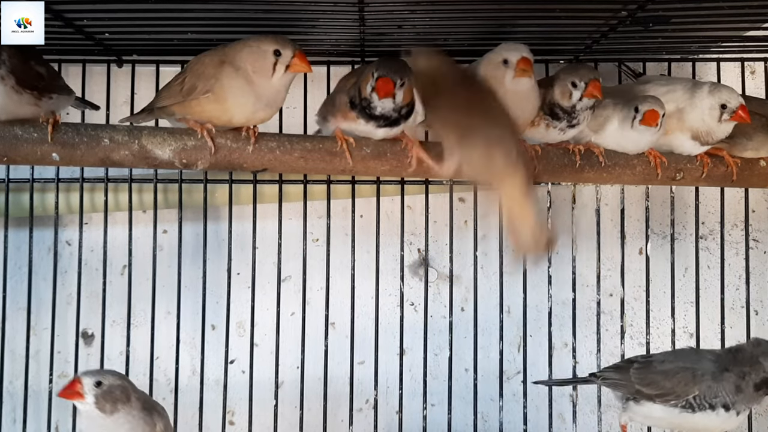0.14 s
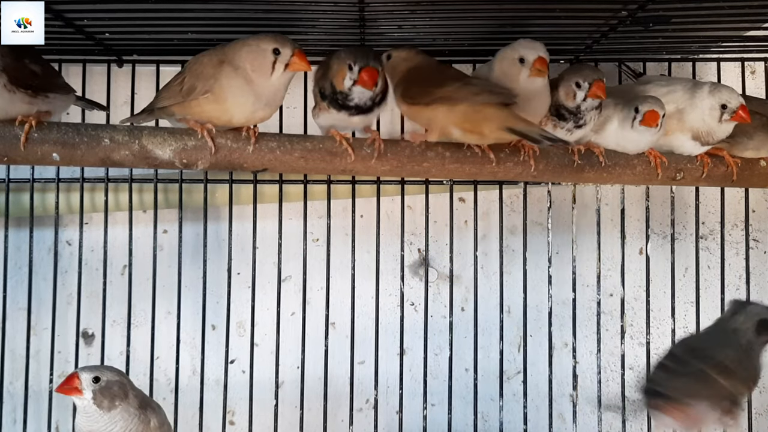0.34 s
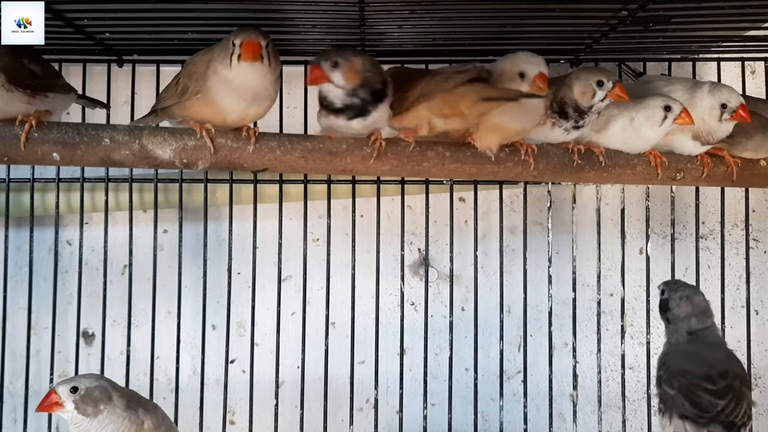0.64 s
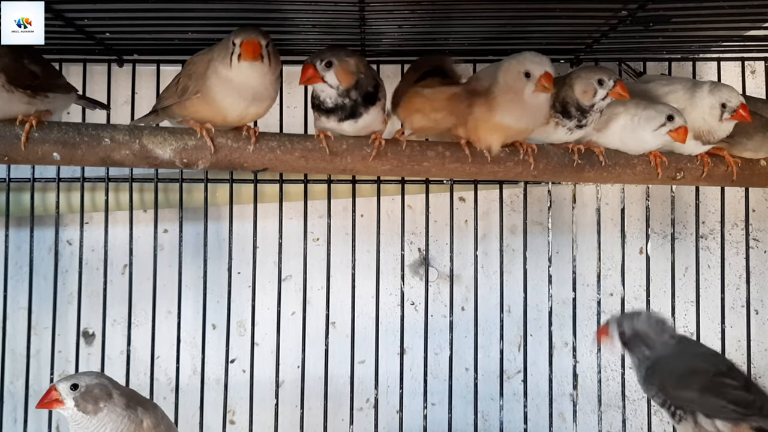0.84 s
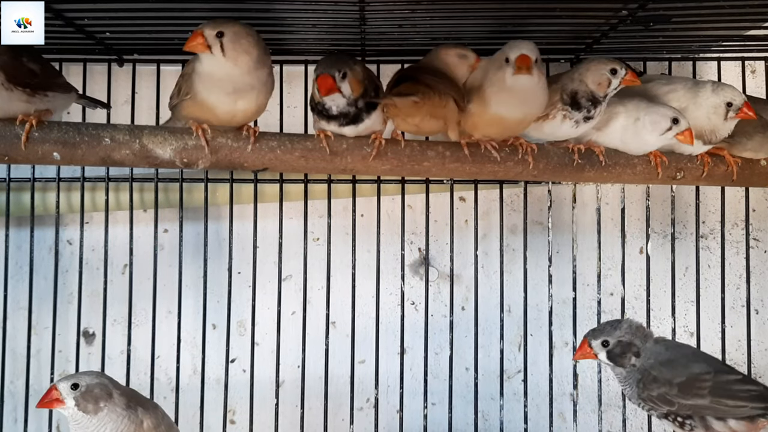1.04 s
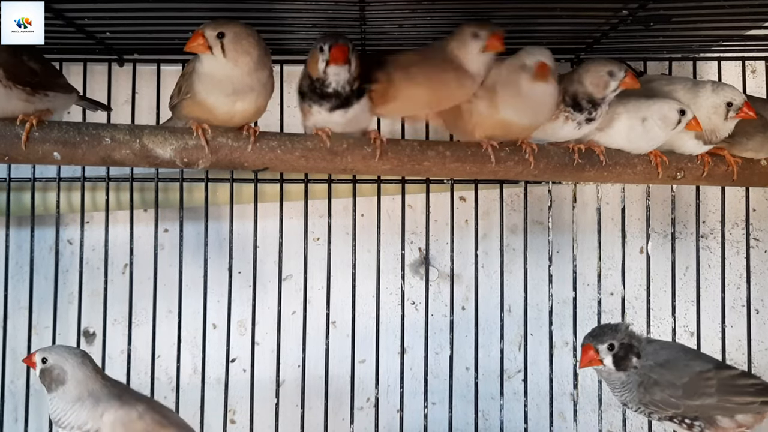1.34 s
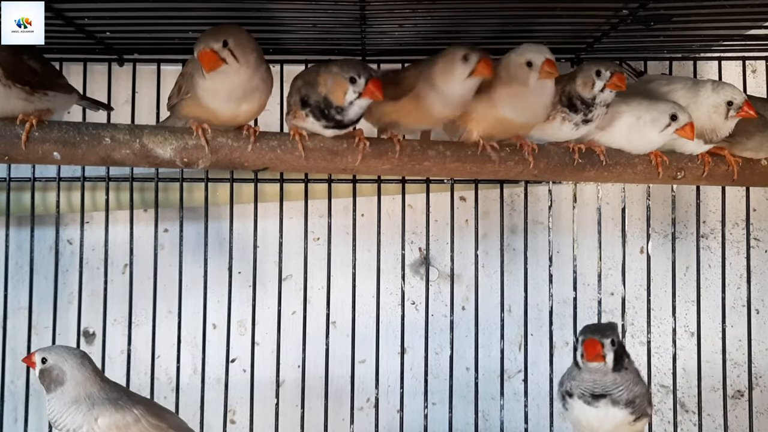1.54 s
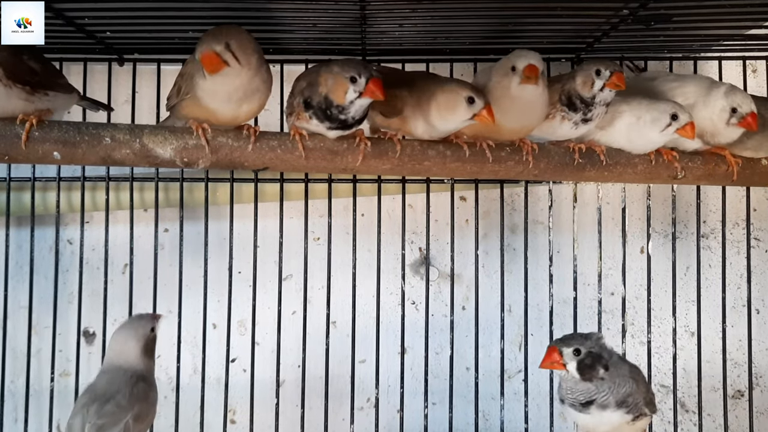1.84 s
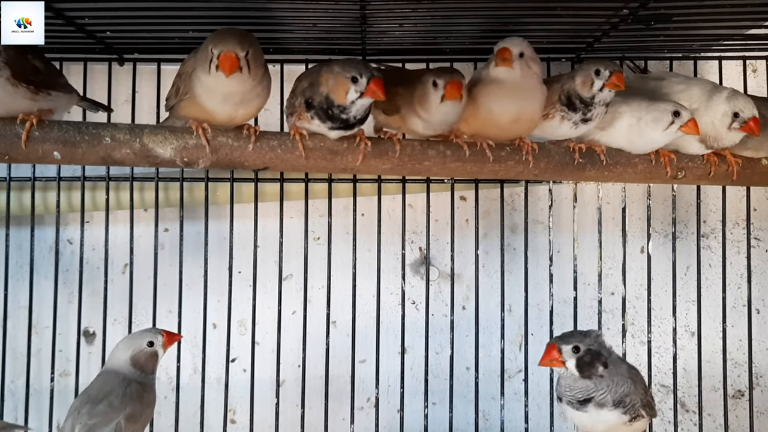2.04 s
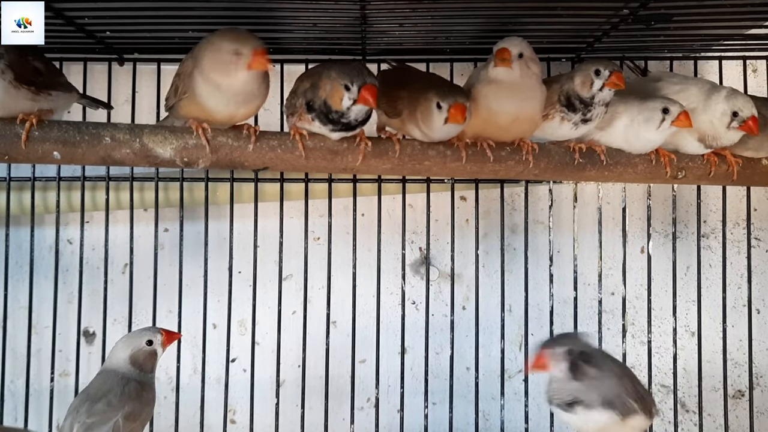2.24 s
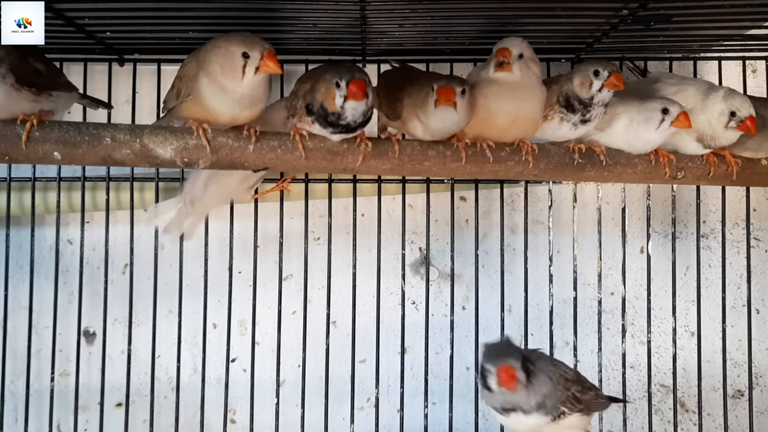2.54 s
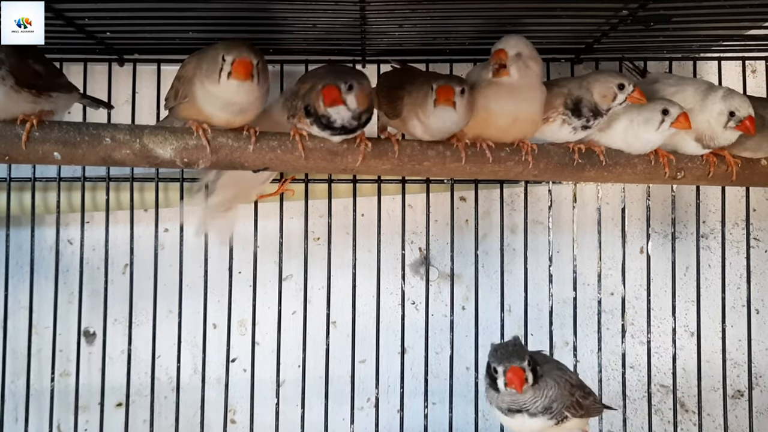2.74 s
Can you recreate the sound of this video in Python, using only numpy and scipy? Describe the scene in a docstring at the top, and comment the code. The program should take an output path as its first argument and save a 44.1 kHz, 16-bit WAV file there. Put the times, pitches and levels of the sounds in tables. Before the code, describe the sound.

Young finches beg in rapid, raspy buzzing calls while adults peep and chatter in an indoor cage

```python
"""A click as the sound cuts in is heard first, then a low room rumble, a far flock and adult finches' peeps,
in a cage indoors. Young on a perch soon rasp harsh begging calls; adults chatter late.
Peeps are gliding oscillators with hiss; rasps and chatter are uneven pulses and noise through resonances;
click, rumble, flock and air are filtered noise, the flock with faint peeps added.
The right microphone port is open; the muffled left port receives dulled reflections and the rumble."""
import sys
import numpy as np
from scipy import signal
from scipy.fft import rfft, irfft, next_fast_len
from scipy.io import wavfile
from scipy.ndimage import uniform_filter1d

SR = 44100
rng = np.random.default_rng(int(sys.argv[2]) if len(sys.argv) > 2 else 0)


def invert_db(x):
    """Field ratio 10**(x/20) for x, a level in decibels (scalar or array-like)."""
    u = np.asarray(x, float) / 20
    return 10 ** u


def master_out(mix):
    """Clip the mix to full scale and print it as 16-bit PCM to the path in sys.argv[1]."""
    frames = np.transpose(np.atleast_2d(mix))
    ceiling = np.clip(frames, -1, 1)
    pcm = np.round(ceiling * 32767).astype(np.int16)
    wavfile.write(sys.argv[1], SR, pcm)


N = 125685  # samples in the scene
POOL = N // 8  # samples drawn for each call's noise

# Spectrum of the room rumble, with soft hums near 73, 111 and 510 Hz:
# (frequency [Hz], relative level [dB])
RUMBLE_SPECTRUM = [(15, -13), (30, -17), (55, -3.5), (68, -4), (73, 7.5), (82, -4.5), (103, 1.5), (111, 4),
                   (125, -4), (190, -5.5), (260, -18.5), (400, -35.5), (510, -14), (700, -32), (1500, -55),
                   (16000, -158)]
# Low noise at the right port before its swell, a click where the sound cuts in, then rumble:
# (time [s], level [dB])
CLICK_AND_RUMBLE_LEVEL = [(0, -41.5), (.1, -52.5), (.22, -66), (.35, -51), (.5, -57), (.7, -51),
                          (1.1, -48.5), (1.4, -61), (1.55, -44), (1.8, -51.5), (2.05, -53.5), (2.2, -54.5),
                          (2.5, -49), (2.85, -52.5)]
# Spectrum of the far flock and air at the open port: (frequency [Hz], relative level [dB])
FLOCK_SPECTRUM = [(800, -17), (1100, -18), (1700, -8), (2500, -12.5), (4000, -13), (5500, -5), (6800, -7),
                  (8200, -17), (11000, -21.5), (16000, -35.5)]
# Spectrum of dull room noise at the open port: (frequency [Hz], relative level [dB])
AIR_SPECTRUM = [(60, -28), (200, 3), (350, -15), (500, 3.5), (750, -17), (1100, -9.5), (1600, -56),
                (16000, -60)]
# Course of that noise: (time [s], level [dB])
AIR_LEVEL = [(0.05, -59), (0.16, -62), (0.36, -60.5), (1.09, -47.5), (1.21, -50.5), (1.46, -48),
             (1.63, -42.5), (1.71, -47.5), (1.98, -52), (2.18, -70), (2.73, -45.5), (2.85, -49.5)]
# Transmission of the muffled left port: (frequency [Hz], gain [dB])
MUFFLE = [(100, -38), (700, -26), (1300, -33), (2400, -35), (4400, -56), (6500, -106.5), (8000, -124),
          (16000, -68)]
# Peeps: (start [s], length before the added tail [s], whistle level before fuzz and envelope [dB],
# start pitch [Hz], end pitch [Hz], octave relative to whistle [dB])
PEEPS = [(0.067, .025, -39, 4300, 3690, -14), (0.064, .03, -44, 2290, 1680, -16),
         (0.108, 0.018, -41.5, 1680, 1580, -22), (0.168, 0.015, -40.5, 1890, 1890, -16),
         (0.206, 0.016, -41, 1747, 1670, -20), (0.291, 0.028, -38, 1652, 1700, -23),
         (0.269, 0.019, -43, 1215, 1126, 6.5), (.325, 0.054, -34.5, 4000, 3900, -20),
         (0.683, 0.073, -29, 2993, 3198, -26), (0.749, 0.048, -23, 3910, 3094, -26),
         (.795, 0.034, -37, 3000, 1692, -29), (0.805, 0.045, -25.5, 3740, 2760, -27),
         (0.926, .03, -29, 4290, 2950, -22), (0.949, 0.022, -38, 2800, 2280, -37),
         (0.973, 0.026, -38, 2540, 3200, -20), (0.989, 0.022, -29.5, 4400, 3200, -22),
         (1.01, .015, -40, 3090, 2660, -24), (1.01, 0.02, -40.5, 1449, 1630, 2),
         (1.032, 0.016, -35, 4240, 4820, -12), (1.18, 0.019, -34, 2900, 2910, -23),
         (1.212, 0.079, -37, 1620, 1792, -8), (1.31, 0.0099, -35, 2735, 2830, 5),
         (1.342, .015, -33, 2420, 2430, -20), (1.368, 0.019, -44, 2740, 2620, 5),
         (1.398, 0.043, -33.5, 2574, 2980, 5), (1.479, 0.043, -31.5, 2550, 2712, 4),
         (1.563, 0.041, -34, 2550, 2690, 2), (1.651, 0.062, -36.5, 2550, 2785, 7.5),
         (1.86, 0.028, -33, 2750, 2710, 10), (1.933, 0.036, -36.5, 1755, 1744, 6.5),
         (1.984, 0.025, -36.5, 1546, 1550, 4), (2.037, 0.033, -31.5, 3200, 2594, 8),
         (2.075, 0.015, -37, 2046, 2050, -21), (2.134, 0.0292, -30, 2750, 3040, -14),
         (2.197, 0.049, -25, 3700, 3460, -17), (2.233, 0.019, -26, 3500, 2800, -11.5),
         (2.25, 0.054, -32.5, 4400, 3600, -19), (2.253, .02, -34.5, 2522, 2400, 0),
         (2.286, 0.01, -29.5, 4310, 4350, -20), (2.374, 0.0373, -27.5, 3450, 3100, -10),
         (2.415, 0.018, -28.5, 3282, 4000, -17), (2.425, 0.031, -38, 2200, 1100, -20),
         (2.459, 0.0099, -36, 5300, 5300, -26), (2.523, .025, -50, 3300, 2400, -20),
         (2.54, 0.045, -39.5, 4520, 3500, -15), (0.913, 0.0363, -21, 7190, 6900, -27),
         (2.013, 0.022, -25, 7220, 7100, -23), (1.785, 0.016, -29.5, 2704, 2750, 4),
         (1.249, 0.029, -38.5, 2280, 2900, -8), (1.373, 0.025, -47.5, 1973, 1600, -16),
         (0.106, 0.027, -46, 1390, 1000, -14), (2.305, 0.033, -36.5, 1836, 1980, -15),
         (2.332, 0.038, -27, 2600, 2843, -15), (2.504, 0.013, -31, 4504, 4540, -27),
         (2.512, 0.06, -42.5, 1800, 1684, 3.5), (2.569, 0.038, -32.5, 2560, 2675, -22),
         (2.594, 0.021, -33, 2996, 3110, -31), (2.69, 0.018, -51, 1600, 1570, -27),
         (2.752, 0.035, -51, 1214, 1210, -30), (2.81, 0.015, -34.5, 2427, 2460, -13.5)]
# Begging rasps: (start [s], length [s], level before envelope [dB], beak resonance at start [Hz],
# beak resonance at end [Hz], throat band [dB])
RASPS = [(.16, 0.044, -34.5, 5080, 5650, -10), (0.182, 0.071, -25, 5930, 6470, -7),
         (0.249, 0.09, -22, 6300, 5960, -5), (0.311, 0.17, -22, 6840, 6500, -3.5),
         (0.389, 0.055, -16.5, 5960, 5850, -12), (0.426, 0.07, -21.5, 5070, 5730, -0.5),
         (0.492, 0.1, -14.5, 6360, 5790, -6), (0.569, 0.091, -19, 5630, 5900, -0.5),
         (.645, 0.11, -14, 6320, 6140, -2.5), (0.741, 0.053, -25.5, 5200, 5030, -8),
         (0.782, 0.053, -30, 6200, 6300, -1), (0.825, 0.13, -16.5, 6750, 6390, -5),
         (1.049, 0.15, -16, 6190, 6460, -5.5), (1.358, 0.033, -30, 5140, 5040, 0.5),
         (1.505, 0.099, -18.5, 5890, 6330, -6.5), (1.65, 0.08, -21.5, 5650, 6220, -13),
         (1.715, 0.11, -17, 5610, 6120, -6.5), (1.768, 0.089, -19, 5770, 6640, -6),
         (1.843, 0.072, -18, 6550, 5980, -8), (1.894, 0.074, -20.5, 6340, 6340, -4.5),
         (1.936, 0.094, -17, 5240, 5700, -10), (2, 0.066, -17.5, 6650, 6330, -4),
         (2.055, 0.086, -22, 5870, 6880, -1)]
# Narrow rings in a rasp: (share of the beak resonance [ratio], mean level [dB])
RINGS = [(1.0, -7.5), (1.12, -12), (.86, -23), (.63, -16.5), (0.481, -19)]
# Final colour of a rasp: (frequency [Hz], gain [dB])
BEAK_COLOUR = [(1000, -21), (2000, 3), (2800, 2), (4000, -1), (7400, 1.5), (8300, -2), (11000, -0.5),
               (16000, -0.5)]
# Adult chatter: (start [s], length [s], level before envelope [dB], resonance [Hz], pulse rate [Hz])
CHATTER = [(2.24, 0.091, -29, 3300, 300), (2.276, 0.035, -26, 3250, 261.5), (2.351, 0.025, -31, 3440, 300),
           (2.384, 0.045, -22.5, 3420, 211.5), (2.421, 0.055, -31, 3320, 247.2),
           (2.523, 0.036, -36, 3080, 300), (2.557, 0.059, -32.5, 3040, 300)]

RUMBLE_LEFT_DB, RUMBLE_SAME, RUMBLE_SWELL_DB = -2.5, .88, .8  # left gain, port correlation, swell rms
FLOCK_DB, PATCHY_DB = -35, 1.2  # wash level, rms unevenness
FAR_PEEPS_PER_S, FAR_LOW_HZ, FAR_HIGH_HZ = 30, 1000, 3200
ROOM_T60_S, ROOM_DB = .09, -12
PEEP_BEND, PEEP_ROUND, PEEP_TAIL_S = 1.6, .55, 0.00583  # glide exponent, envelope exponent
PEEP_FUZZ, PEEP_FUZZ_HZ, PEEP_WOBBLE = .75, 300, .014  # hiss amplitude, pole width, relative pitch rms
PULSE_JITTER = .5  # rms of the log pulse rate
RISE_S, FALL_S, SWELL_DB, WAVER_DB = 0.015, 0.011, -5, 2.5  # swell: gain at either end; waver: rms
RASP_PULSES_HZ, RASP_NOISE = 628.2, .62  # rate before jitter, share of noise
BEAK_WIDTH_HZ, BEAK_WANDER, EDGE_DB = 2590, 0.035, -14  # pole width, relative rms, unfiltered drive
RING_WIDTH_HZ, RING_FLICKER_DB = 224, 3
THROAT_HZ, THROAT_WIDTH_HZ, THROAT_WANDER = 3900, 2280, .05  # centre, pole width, relative rms
CHATTER_WIDTH_HZ, CHATTER_NOISE, CHATTER_WIDE_DB = 720, 0.5, -9
OVERLOAD = .8  # amplitude limit of the microphone


def evened(x):
    """Normalization: equal mean power, rms 1."""
    return x / np.sqrt(np.mean(x ** 2) + 1e-20)


def colour(x, points):
    """Linear filtering: the spectrum is multiplied by a gain table of (Hz, dB)."""
    f, db = np.transpose(points)
    size = next_fast_len(len(x) + 256)
    hz = np.fft.rfftfreq(size, 1 / SR) + 1  # the offset avoids log(0)
    gain = invert_db(np.interp(np.log(hz), np.log(f), db))
    return irfft(rfft(x, size) * gain, size)[:len(x)]


def drift(size, smooth_s):
    """Random modulation: twice-averaged noise, normalized to rms 1 over the pool."""
    k = max(int(smooth_s * SR), 2)
    smooth = uniform_filter1d(uniform_filter1d(rng.standard_normal(POOL), k), k)
    return evened(smooth)[:size]


def add(mix, start_s, sound):
    """Superposition: a sound is summed into the mix from its start."""
    part = mix[round(start_s * SR):][:len(sound)]
    part += sound[:len(part)]


def resonate(x, hz, width_hz):
    """Resonance: two cascaded poles, each width_hz wide, follow the frequency curve hz."""
    turn = np.exp(2j * np.pi * np.cumsum(hz * np.ones(len(x))) / SR)
    r = np.exp(-np.pi * width_hz / SR)
    # shift the resonance to zero frequency, low-pass, shift back
    lowered = signal.lfilter([1], np.convolve([1, -r], [1, -r]), x / turn)
    return evened((turn * lowered).real)


def click_and_rumble():
    """Partial coherence: low filtered noise, partly alike in both ports, clicks in, then rumbles."""
    right, other = (evened(colour(v, RUMBLE_SPECTRUM)) for v in rng.standard_normal((2, N)))
    left = invert_db(RUMBLE_LEFT_DB) * (RUMBLE_SAME * right + np.sqrt(1 - RUMBLE_SAME ** 2) * other)
    t = np.arange(N) / SR
    rates_hz = np.geomspace(.3, 6, 20)
    swell = evened(sum(np.sin(2 * np.pi * (f * t + rng.random())) / np.sqrt(f) for f in rates_hz))
    level_db = np.interp(t, *np.transpose(CLICK_AND_RUMBLE_LEVEL)) + RUMBLE_SWELL_DB * swell
    return invert_db(level_db) * np.array([left, right])


def far_flock():
    """Incoherent summation: distant birds and air form a patchy wash with faint peeps scattered in it."""
    frames = N // 128 + 6
    real, imaginary, patches = rng.standard_normal((frames, 257, 3)).T
    # smooth the patches over frequency, then over time
    patches = evened(uniform_filter1d(uniform_filter1d(patches, 7, 0), 14, 1))
    spectrum = (real + 1j * imaginary) * invert_db(PATCHY_DB * patches)
    wash = signal.istft(spectrum, nperseg=512, noverlap=384)[1][:N]
    out = invert_db(FLOCK_DB) * evened(colour(wash, FLOCK_SPECTRUM))
    for when, long, loud, high, bend in rng.random((round(FAR_PEEPS_PER_S * N / SR), 5)):
        hz = FAR_LOW_HZ * (FAR_HIGH_HZ / FAR_LOW_HZ) ** high
        end_hz = hz * (.85 + 0.276 * bend)
        add(out, *peep(when * N / SR, 0.031 + 0.012 * long, -52 + 8 * loud, hz, end_hz, -7.5))
    return out


def air():
    """Amplitude modulation: dull filtered room noise swells and sinks."""
    level_db = np.interp(np.arange(N) / SR, *np.transpose(AIR_LEVEL))
    return invert_db(level_db) * evened(colour(rng.standard_normal(N), AIR_SPECTRUM))


def room(x):
    """Reverberation: convolution with an exponentially decaying noise tail of unit energy."""
    t = np.arange(SR // 3) / SR
    tail = rng.standard_normal(len(t)) * invert_db(-60 * t / ROOM_T60_S) * (t > .002)
    return signal.fftconvolve(x, tail / np.linalg.norm(tail))[:N]


def peep(start, length, db, from_hz, to_hz, octave_db):
    """Frequency modulation: a gliding whistle and its octave, made hoarse by resonant hiss."""
    t = np.arange(0, length + PEEP_TAIL_S, 1 / SR)
    glide = from_hz + (to_hz - from_hz) * (t / t[-1]) ** PEEP_BEND
    hz = glide * (1 + PEEP_WOBBLE * drift(len(t), 0.0032))
    phase = 2 * np.pi * np.cumsum(hz) / SR
    hiss = rng.standard_normal(POOL)[:len(t)]
    tone = np.sqrt(2) * np.sin(phase) + PEEP_FUZZ * resonate(hiss, hz, PEEP_FUZZ_HZ)
    octave = np.sin(2 * phase) + resonate(hiss, 2 * hz, 2 * PEEP_FUZZ_HZ)
    envelope = abs(np.sin(np.pi * t / t[-1])) ** PEEP_ROUND
    return start, invert_db(db) * envelope * (tone + invert_db(octave_db) * octave)


def folds(size, rate_hz, noise):
    """Pulsed excitation: vocal membranes give uneven pulses, with noise puffed on each cycle."""
    turns = np.cumsum(rate_hz * np.exp(PULSE_JITTER * drift(size, .002))) / SR
    pulses = np.diff(np.floor(turns), prepend=0) * (1 + 0.19 * drift(size, 0.00088))
    puffs = (0.9 + np.exp(-(turns % 1) / 0.55)) * rng.standard_normal(POOL)[:size]
    return (1 - noise) * evened(pulses) + noise * evened(puffs)


def shape(t, length):
    """Amplitude envelope: soft rise, a wavering swell, soft fall."""
    edge = np.clip(np.minimum(t / RISE_S, (length - t) / FALL_S), 0, 1)
    swell_db = SWELL_DB * (2 * t / length - 1) ** 2 + WAVER_DB * drift(len(t), .014)
    return np.sin(edge * np.pi / 2) ** 2 * invert_db(swell_db)


def rasp(start, length, db, from_hz, to_hz, throat_db):
    """Source and filter: chaotic pulses excite a wide beak resonance, flickering rings and the throat."""
    t = np.arange(0, length, 1 / SR)
    drive = folds(len(t), RASP_PULSES_HZ, RASP_NOISE)
    beak_hz = from_hz + (to_hz - from_hz) * t / length
    voice = resonate(drive, beak_hz, BEAK_WIDTH_HZ) + invert_db(EDGE_DB) * drive
    for share, ring_db in RINGS:
        ring_hz = share * beak_hz * (1 + BEAK_WANDER * drift(len(t), 0.017))
        ring = resonate(drive, ring_hz, RING_WIDTH_HZ)
        voice = voice + invert_db(ring_db + RING_FLICKER_DB * drift(len(t), 0.022)) * ring
    throat_hz = THROAT_HZ * (1 + THROAT_WANDER * drift(len(t), 0.042))
    # the throat band enters with opposite sign
    voice = voice - invert_db(throat_db) * resonate(drive, throat_hz, THROAT_WIDTH_HZ)
    return start, invert_db(db) * shape(t, t[-1]) * evened(colour(voice, BEAK_COLOUR))


def chatter(start, length, db, hz, pulses_hz):
    """Source and filter: slower pulses excite a lower resonance."""
    t = np.arange(0, length, 1 / SR)
    drive = folds(len(t), pulses_hz, CHATTER_NOISE)
    wandering_hz = hz * (1 + BEAK_WANDER * drift(len(t), 0.0069))
    voice = resonate(drive, wandering_hz, CHATTER_WIDTH_HZ)
    voice = voice + invert_db(CHATTER_WIDE_DB) * resonate(drive, hz, 1700)
    return start, invert_db(db) * shape(t, t[-1]) * evened(voice)


def scene():
    """Direct and reverberant fields: the open port hears both, the muffled one dulled reflections."""
    birds = np.zeros(N)
    for voice, rows in ((peep, PEEPS), (rasp, RASPS), (chatter, CHATTER)):
        for row in rows:
            add(birds, *voice(*row))
    right = birds + invert_db(ROOM_DB) * room(birds) + far_flock() + air()
    left = colour(room(right), MUFFLE)
    return np.array([left, right]) + click_and_rumble()


def low_pass(x):
    """Removes everything above the highest recorded frequency."""
    return signal.sosfilt(signal.butter(12, 15970, fs=SR, output="sos"), x)


def record(dry):
    """Saturation: the microphone rounds the highest peaks."""
    mix = OVERLOAD * np.tanh(dry / OVERLOAD)
    return low_pass(mix)


dry = scene()
out = record(dry)
master_out(out)
```